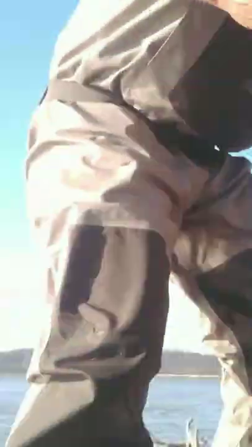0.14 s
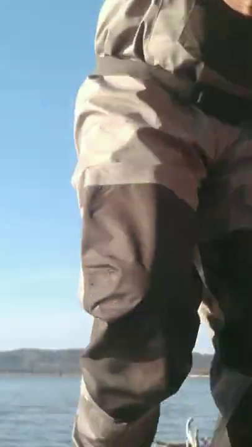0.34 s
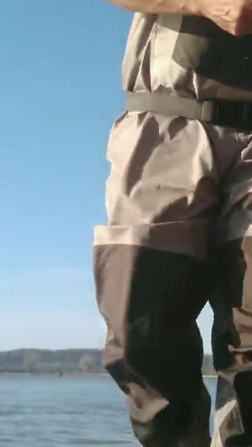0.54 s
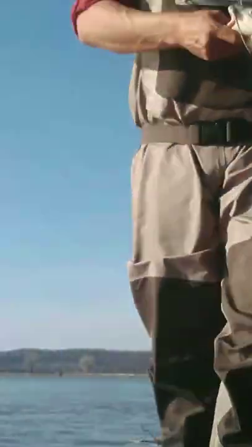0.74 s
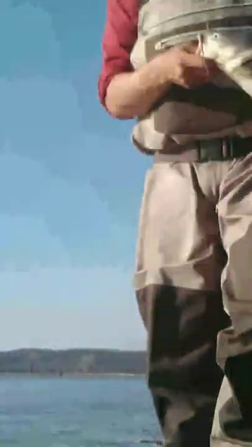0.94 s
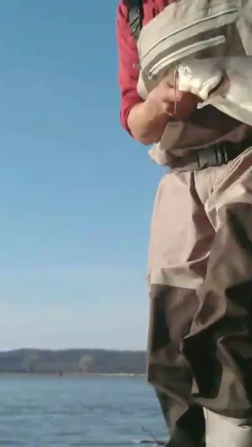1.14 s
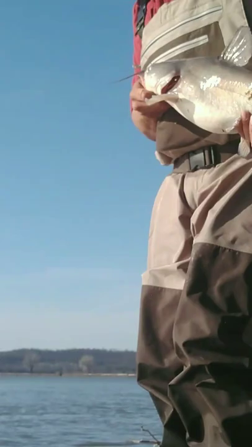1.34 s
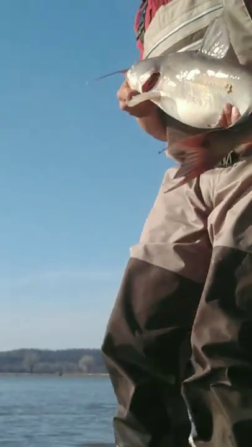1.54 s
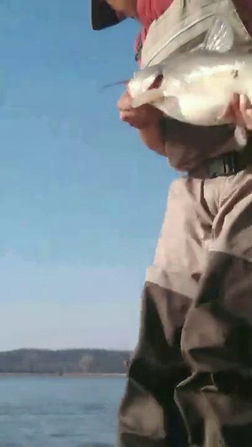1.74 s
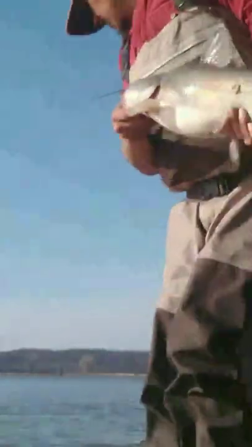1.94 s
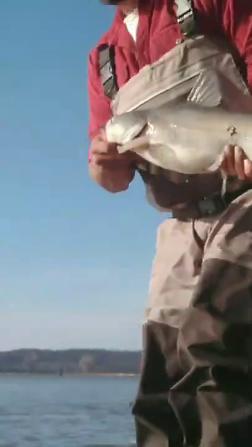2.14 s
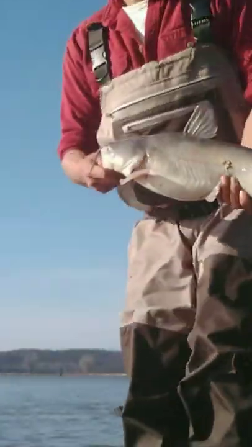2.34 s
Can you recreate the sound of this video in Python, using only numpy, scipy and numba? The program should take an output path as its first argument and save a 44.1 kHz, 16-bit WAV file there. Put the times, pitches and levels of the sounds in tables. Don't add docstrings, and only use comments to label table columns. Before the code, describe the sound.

Stiff wader fabric rustles in grainy, stuttering rubs close to a phone. From 0.1 to 0.4 s it is busiest: hard hollow boot knocks, sharp fold snaps, buckle clinks and tiny rubber creaks. A deep step lands near 0.55 s, more scuffs until 1 s, then sparser swishes, with a crisp snap at 1.53 s and soft bumps to the end. Faint water mutters low; wide, thin stereo.

```python
import sys
import numpy as np
from scipy import signal
from scipy.fft import rfft, irfft, next_fast_len
from scipy.io import wavfile
from scipy.ndimage import uniform_filter1d
from numba import njit

SR = 44100
rng = np.random.default_rng(int(sys.argv[2]) if len(sys.argv) > 2 else 0)


def voltage_ratio(decibels):
    exponent = np.asarray(decibels, float) / 20
    return 10 ** exponent


def store_wav(level_fs):
    pcm = np.round(np.clip(np.atleast_2d(level_fs), -1, 1) * 32767)
    wavfile.write(sys.argv[1], SR, pcm.T.astype(np.int16))


N = 105046
CLOTH_LAG_S, DECK_LAG_S = -0.00011, 0.00014


@njit
def svf(x, hz, width):
    y, band, low = np.empty(len(x)), 0., 0.
    g, k = np.tan(np.pi * hz / SR), width / hz
    for i in range(len(x)):
        v = (band + g * (x[i] - low)) / (1 + g * (g + k))
        band = 2 * v - band
        low += 2 * g * v
        y[i] = k * v
    return y


def unit(x):
    return x / np.sqrt(np.mean(x ** 2))


def late(x, s):
    n = next_fast_len(N + 64)
    hz = np.fft.rfftfreq(n, 1 / SR)
    return irfft(rfft(x, n) * np.exp(-2j * np.pi * hz * s), n)[:N]


def walk(rate):
    hold = max(int(SR / rate), 1)
    steps = rng.standard_normal(N)[np.arange(N) // hold]
    return unit(uniform_filter1d(steps, hold))


def grains(spread_db, share):
    chance, side, size = rng.random((3, N))
    slips = (chance < share) * np.sign(side - 0.5) * voltage_ratio(-spread_db * np.log(size + 1 / 20)) * 2.63
    return unit(rng.standard_normal(N) + slips)


# peak in seconds, rise in seconds, fall in
# seconds, hiss level in dB, deck level against the hiss in dB.
RUBS = [(0.035, 0.038, 0.043, -82.5, 23), (.072, 0.0044, 0.033, -64, -7), (0.102, 0.026, 0.041, -46, 3.5),
        (0.158, 0.011, 0.02, -43.5, 10), (0.186, 0.0037, 0.015, -47, 14),
        (0.213, 0.021, 0.031, -50.5, 11.5), (.248, 0.0029, 0.0086, -43.5, 3),
        (0.277, .02, 0.063, -59.5, 16.5), (0.352, 0.031, 0.13, -62, 12), (0.413, 0.02, 0.014, -59.5, 21),
        (0.461, 0.056, 0.039, -64.5, 13.5), (0.564, 0.05, 0.044, -44.5, 4),
        (0.609, 0.0072, 0.012, -50.5, 11.5), (0.707, 0.11, 0.07, -55.5, 10), (.80, 0.057, 0.042, -71, 19),
        (0.847, 0.042, 0.058, -55, 4), (0.949, 0.095, 0.026, -58, 6.5),
        (1.117, 0.044, 0.068, -60, 7.5), (1.318, 0.0099, 0.044, -65, 2),
           (1.367, .012, 0.041, -45.5, 2.5), (1.44, 0.026, 0.041, -58.5, 11),
           (1.527, 0.0076, 0.035, -52.5, 6.5), (1.607, 0.026, 0.033, -54.5, 7),
           (1.684, 0.028, 0.035, -64, 12.5), (1.77, 0.0034, 0.092, -74, -5), (1.858, 0.0044, 0.014, -60, 6),
           (1.89, 0.034, 0.07, -56, 0.5), (1.94, 0.017, 0.027, -48.5, -0.5),
           (2.009, 0.019, 0.058, -59.5, 12), (2.131, 0.016, 0.08, -55.5, 7.5),
           (2.222, 0.022, 0.045, -59, 10)]


def effort():
    t, hiss, scuff = np.arange(N) / SR, 0, 0
    for s, rise, fall, db, deck_db in RUBS:
        span = np.where(t < s, rise + 0.0012, fall + 0.00091)
        swell = voltage_ratio(db) * np.exp(-(np.abs(t - s) / span) ** 1.76)
        hiss = hiss + swell ** 2
        scuff = scuff + (swell * voltage_ratio(deck_db)) ** 2
    return np.sqrt(hiss), np.sqrt(scuff)


# band centre in Hz, level in dB.
CLOTH = [
    (1500, -19),
    (2200, 12.5),
    (3100, -10.5),
    (4200, 7),
    (6000, -1),
    (8500, -1.5),
    (11500, 4.5),
    (14000, -6),
]


def cloth(x, patches_db=np.zeros(len(CLOTH))):
    return sum(voltage_ratio(db + patch_db) * svf(x, hz, 0.34 * hz)
               for (hz, db), patch_db in zip(CLOTH, patches_db))


def swish(press):
    floor_db, patchy_db = -84, 2.5
    shared = 0.043
    slip = voltage_ratio(1.62 * walk(70) + 1.5 * walk(270)) * (press + voltage_ratio(floor_db))
    patches_db = [patchy_db * walk(14) for _ in CLOTH]
    both, up, low = (unit(cloth(grains(spread_db=2.0, share=0.011), patches_db)) * slip for _ in range(3))
    upper = np.sqrt(shared) * late(both, CLOTH_LAG_S) + np.sqrt(1 - shared) * up
    lower = np.sqrt(shared) * both + np.sqrt(1 - shared) * low
    return np.array([upper, lower]) * 0.99


# pitch in Hz, width in Hz, level in dB.
DECK = [
    (200, 194, -0.5),
    (417, 220, -2.5),
    (560, 190, -3),
    (803, 95, -8),
    (1020, 98, -4.5),
    (1350, 240, -10),
    (1650, 33, -21.5),
    (2620, 1300, -2),
]


def deck(press):
    air_db, ring = -79, 0
    for hz, width, db in DECK:
        stutter = voltage_ratio(db + 1.75 * walk(35.17))
        tone = svf(svf(grains(spread_db=7.0, share=0.004), hz, width), hz, 1.7 * width)
        ring = ring + stutter * tone / np.sqrt(width)
    return unit(ring) * (press * voltage_ratio(2.95 * walk(59)) + voltage_ratio(air_db))


def impacts(table, contact_s):
    level_db, tap_db = -7.5, -7
    out, t = np.zeros(N + 8192), np.arange(8192) / SR
    for s, db, hz, ring_s in table:
        env = (1 - np.exp(-t / contact_s)) * np.exp(-np.log(1000) * t / (ring_s + 0.0012))
        tone = np.sin(2 * np.pi * hz * t) + 0.21 * np.sin(2 * np.pi * 1.2 * hz * t)
        tap = np.exp(-t * hz * 1.45) * np.sin(2 * np.pi * 2.07 * hz * t)
        i = int(s * SR)
        out[i:i + 8192] += voltage_ratio(db + level_db) * (env / env.max() * tone + voltage_ratio(tap_db) * tap)
    return 0.5 * out[:N]


# start in seconds, peak in dB, pitch in Hz, ring in seconds.
KNOCKS = [(0.104, -34, 1020, 0.04), (0.151, -12.5, 566, 0.026), (0.025, -40, 603, 0.014),
          (0.062, -34.5, 560, 0.027), (0.162, -23.5, 560, 0.047), (0.198, -32, 665, 0.044),
          (0.219, -33, 840, 0.015), (0.229, -30.5, 713, 0.05), (0.184, -30, 956, 0.19),
          (0.214, -19.5, 842, 0.026), (0.255, -30.5, 730, 0.053), (0.269, -24.5, 587, 0.058),
          (0.331, -27, 664, 0.017), (0.345, -20, 604, 0.06), (0.359, -24.5, 572, 0.065),
          (0.402, -25.5, 551, 0.064), (0.539, -22.5, 424, 0.031), (0.605, -23.5, 560, 0.02),
          (1.097, -20, 488, 0.017), (1.419, -31.5, 750, 0.023), (1.441, -36.5, 946, 0.044),
          (1.309, -46, 390, 0.072), (1.353, -37, 1070, 0.03), (1.766, -48, 1010, 0.031),
          (1.805, -37, 730, 0.01), (1.851, -48, 554, 0.03), (2.012, -33.5, 480, 0.013),
          (2.05, -36.5, 1010, 0.03), (0.407, -29, 1000, 0.03), (1.082, -36, 510, 0.04),
          (2.162, -37.5, 1050, 0.017), (1.973, -31, 343, 0.025), (2.005, -41, 551, 0.2),
          (2.107, -28, 393, 0.047), (2.203, -32.5, 675, 0.026)]


def knocks():
    return impacts(KNOCKS, contact_s=0.00093)


# start in seconds, peak in dB, tail in seconds, colour in Hz.
SNAPS = [(.0356, -45, 0.013, 7790), (.0671, -43, .012, 8470), (.0751, -36, .012, 6570),
         (0.0962, -25.5, .012, 6820), (.1064, -26.5, .012, 5500), (.1164, -43, .006, 8140),
         (0.1308, -35, .008, 8310), (0.148, -40, 0.0054, 9000), (0.1553, -26, .011, 11000),
         (.1723, -47, .005, 7400), (.188, -25, .0072, 6000), (0.2464, -33, .008, 7880),
         (0.273, -37.5, .008, 6850), (.403, -56, .012, 5860), (.606, -29.5, 0.0085, 7920),
         (.705, -35, 0.0071, 8500), (.7328, -32, 0.009, 9200), (.818, -42.5, .012, 8420),
         (.902, -43, 0.014, 6280), (1.065, -60, .012, 5590), (1.0914, -50, .012, 8270),
         (1.1085, -41, 0.014, 8010), (1.1813, -47, 0.018, 6810), (1.312, -53, .012, 7840),
         (1.353, -49, .012, 6940), (1.362, -31.5, 0.019, 7950), (1.4883, -44, 0.016, 9500),
         (1.5234, -39, .02, 7500), (1.5292, -19.5, 0.018, 7400), (1.597, -37, .012, 8210),
         (1.601, -36, .006, 8530), (1.678, -39, .008, 8700), (1.83, -59, .012, 6110),
         (1.853, -52, .012, 7960), (1.8654, -46, .012, 6330), (2.003, -35, 0.016, 8120),
         (2.108, -43.5, 0.014, 8000)]


def snaps():
    crackle_db, broad_db, width = -8, -12.5, 0.86
    out, t = np.zeros(N + 4096), np.arange(4096) / SR
    for (s, db, tail, hz), noise in zip(SNAPS, rng.standard_normal((len(SNAPS), 4096))):
        crackle = voltage_ratio(crackle_db) * np.exp(-np.log(1000) * t / (tail + 0.0059))
        burst = (t == 0) * 2.66 + noise * (np.exp(-t / 0.00013) + crackle)
        burst = svf(burst, hz, width * hz) + voltage_ratio(broad_db) * cloth(np.gradient(burst))
        i = int(s * SR)
        out[i:i + 4096] += voltage_ratio(db - 2.5) * burst / np.abs(burst).max()
    return out[:N]


# start in seconds, peak in dB, pitch in Hz, ring in seconds.
CLINKS = [
    (0.1067, -26.5, 3590, 0.037),
    (0.1531, -20.5, 2763, 0.058),
    (0.1867, -15, 3190, 0.021),
    (0.1875, -21, 2890, 0.028),
    (0.249, -28, 2640, 0.02),
    (0.26, -32, 2750, 0.02),
    (0.4005, -20, 2510, 0.03),
]


def clinks():
    return impacts(CLINKS, contact_s=0.00053)


# centre in seconds, half length in seconds, level in dB, start in Hz, end in Hz.
CREAKS = [
    (0.108, 0.036, -52, 973, 1020),
    (0.182, 0.023, -47.5, 1696, 1584),
    (0.378, 0.0053, -49.5, 990, 1020),
    (0.416, 0.01, -52.5, 1395, 1350),
    (0.461, 0.011, -59.5, 1084, 1025),
    (0.799, 0.045, -56, 1152, 1020),
    (0.864, 0.023, -54.5, 758, 473),
    (2.136, 0.028, -58.5, 1024, 1059),
]


def creaks():
    t, out = np.arange(N) / SR, 0
    wobble, rough = 1 + 0.0498 * walk(150), voltage_ratio(3.4 * walk(100))
    for s, long, db, hz, end_hz in CREAKS:
        pitch = hz + (end_hz - hz) * np.clip((t - s) / long / 2 + 0.5, 0, 1)
        note = np.sin(2 * np.pi * np.cumsum(pitch * wobble) / SR)
        out = out + voltage_ratio(db) * np.exp(-((t - s) / long) ** 4) * note
    return out * rough


# centre in seconds, level in dB, pitch in Hz, length in seconds.
THUDS = [
    (0.11, -46, 180, 0.0097),
    (0.186, -56, 128, 0.05),
    (0.554, -37.5, 98.5, 0.016),
    (.84, -53, 122.4, 0.02),
    (1.403, -38, 110, 0.0062),
    (1.981, -43, 137, 0.011),
    (2.121, -48, 169, 0.013),
]


def hull():
    lap_db, lap_hz, lap_width_hz = -59, 92, 47.3
    t, noise = np.arange(N) / SR, rng.standard_normal(N)
    out = unit(svf(noise, lap_hz, lap_width_hz)) * voltage_ratio(lap_db + 2 * walk(8.5))
    for s, db, hz, long in THUDS:
        tone = 0.79 * np.sin(2 * np.pi * hz * (t - s))
        rumble = 0.51 * unit(svf(noise, 0.95 * hz, 0.9 * hz))
        out = out + voltage_ratio(db) * np.exp(-((t - s) / long) ** 2) * (tone + rumble)
    return out


def scene():
    hiss, press = effort()
    low = 0.5 * deck(press) + knocks() + creaks()
    tick, buckle = snaps(), clinks()
    apart = voltage_ratio(-11.5) * np.array([deck(press) + hull() for _ in range(2)])
    boom = hull() * voltage_ratio(np.array([[1], [-1]]))
    upper = late(low, DECK_LAG_S) + late(tick, CLOTH_LAG_S) + buckle
    lower = low + 0.53 * tick + voltage_ratio(-10) * late(buckle, 0.000113)
    return np.array([upper, lower]) + boom + apart + swish(hiss)


def roll_off(x):
    return signal.sosfilt(signal.butter(12, 16520, fs=SR, output="sos"), x)


def record(dry):
    cross_gain, cross_s = 0.82, 0.000429
    port_hz, port_width_hz, port_ring = 7640, 4710, 2.72
    left = dry[0] - cross_gain * late(dry[1], cross_s)
    right = dry[1] - cross_gain * late(dry[0], cross_s)
    ring = svf(svf(left, port_hz, port_width_hz), port_hz, 2 * port_width_hz)
    wide = np.array([left + port_ring * ring, right])
    wide = signal.sosfilt(signal.butter(2, [45, 15400], "band", fs=SR, output="sos"), wide)
    wide = signal.sosfilt(signal.butter(16, 15300, fs=SR, output="sos"), wide)
    return roll_off(wide)


dry = scene()
out = record(dry)
store_wav(out)
```